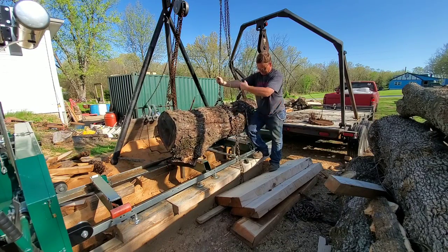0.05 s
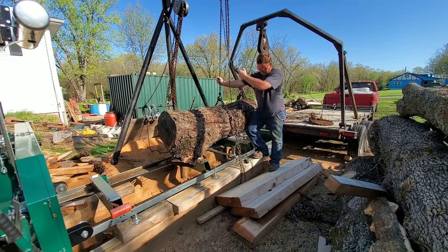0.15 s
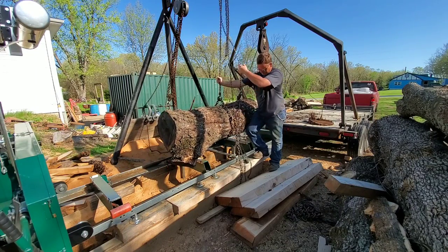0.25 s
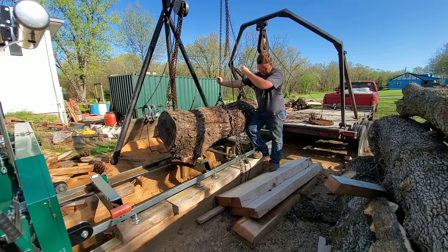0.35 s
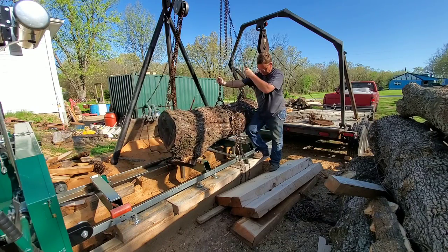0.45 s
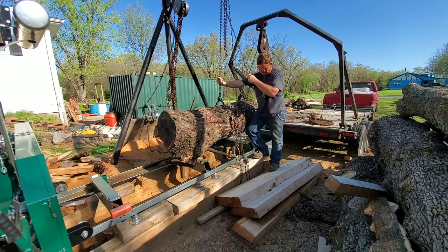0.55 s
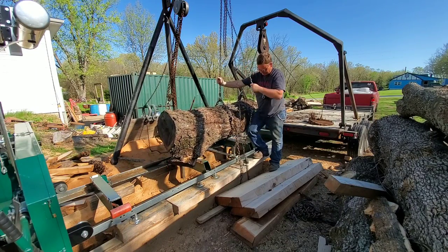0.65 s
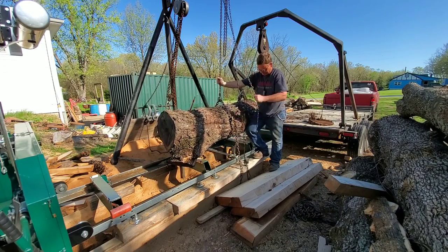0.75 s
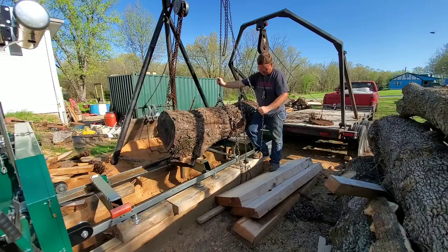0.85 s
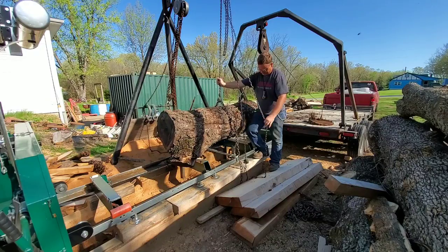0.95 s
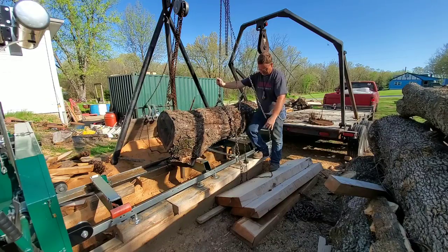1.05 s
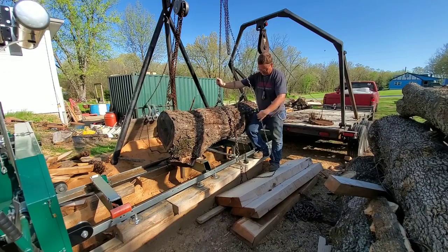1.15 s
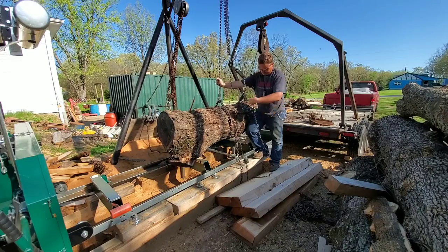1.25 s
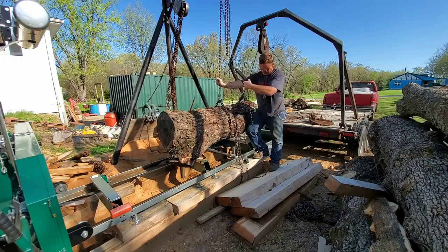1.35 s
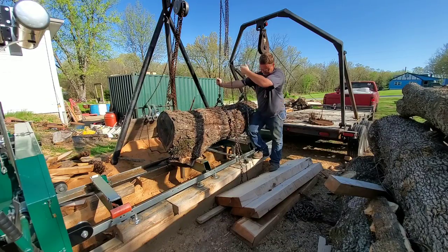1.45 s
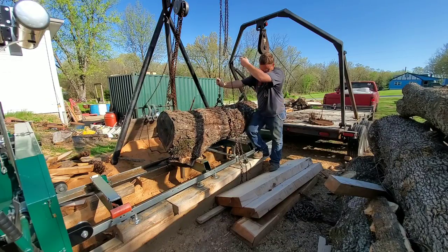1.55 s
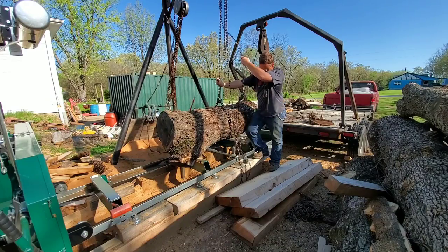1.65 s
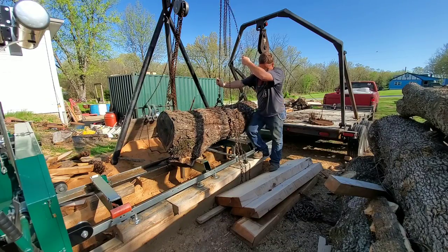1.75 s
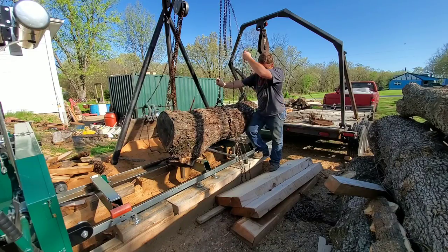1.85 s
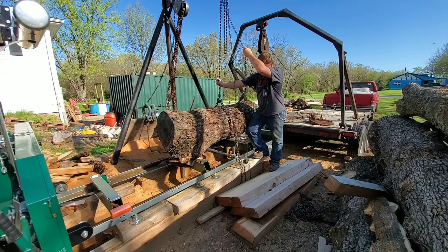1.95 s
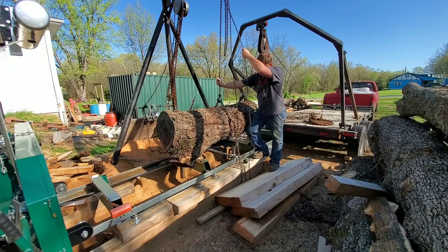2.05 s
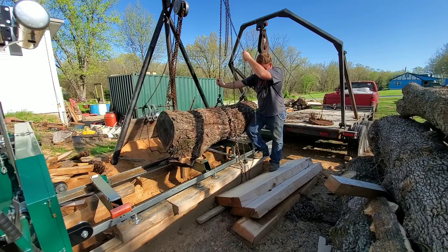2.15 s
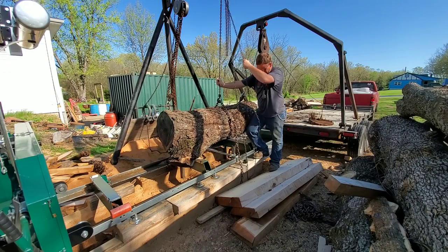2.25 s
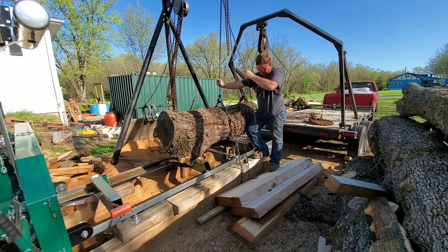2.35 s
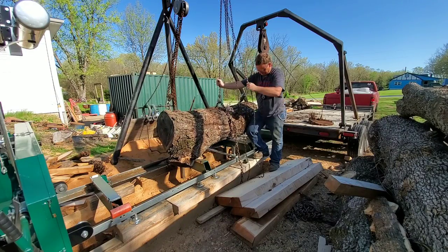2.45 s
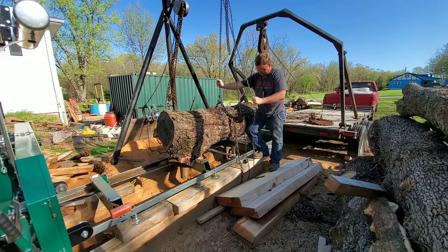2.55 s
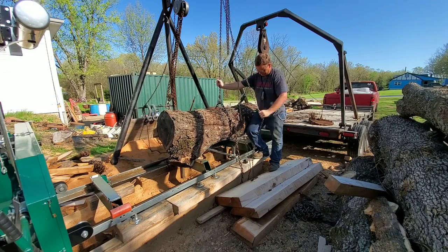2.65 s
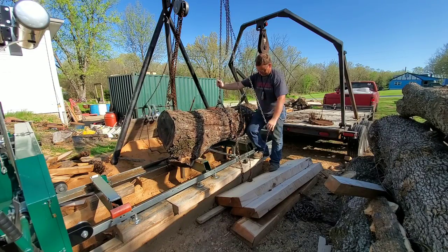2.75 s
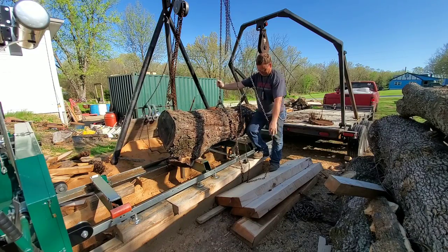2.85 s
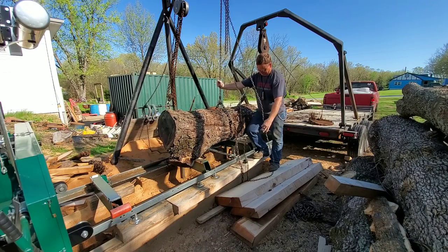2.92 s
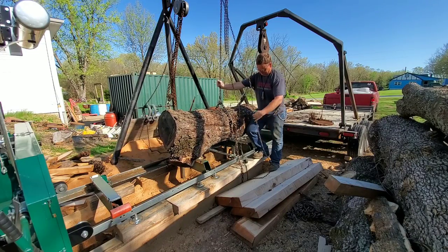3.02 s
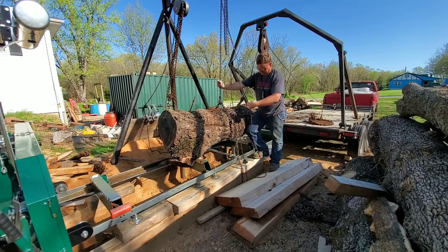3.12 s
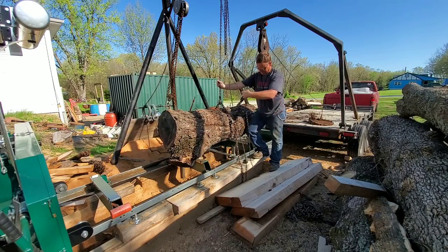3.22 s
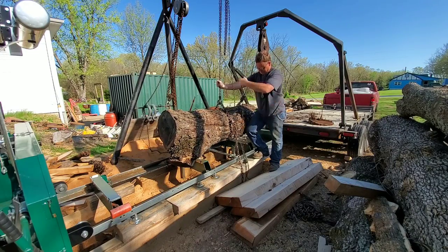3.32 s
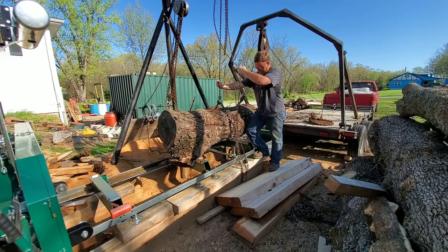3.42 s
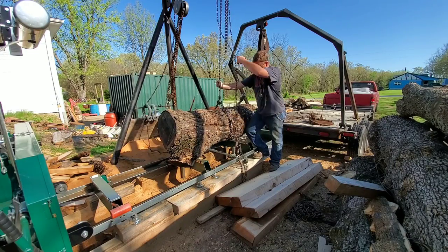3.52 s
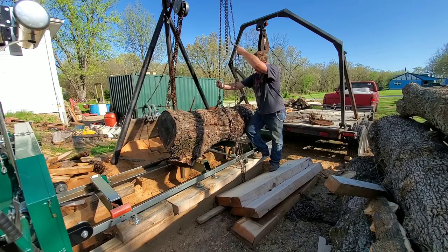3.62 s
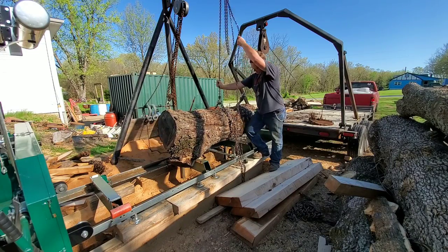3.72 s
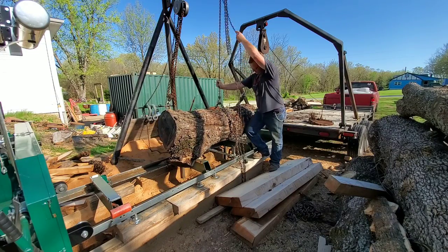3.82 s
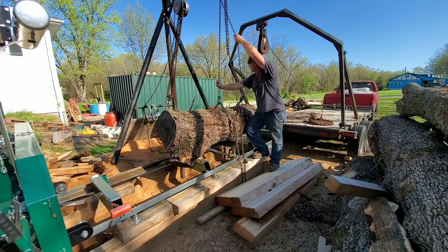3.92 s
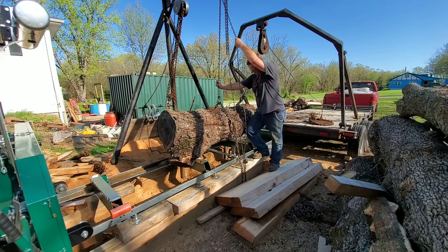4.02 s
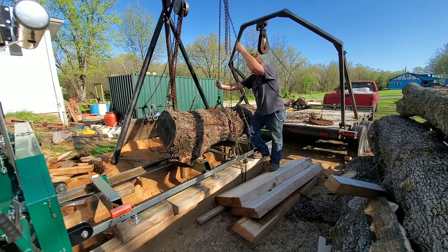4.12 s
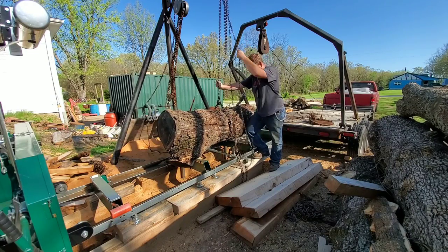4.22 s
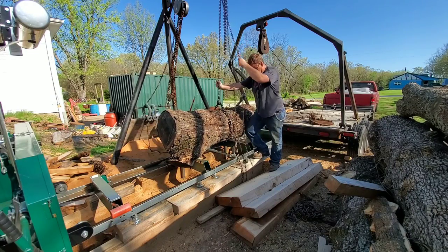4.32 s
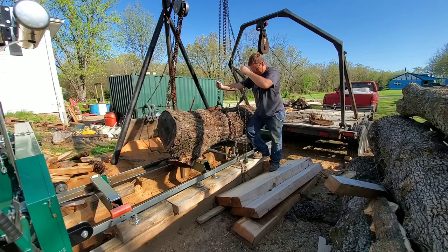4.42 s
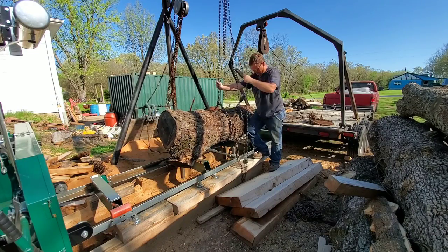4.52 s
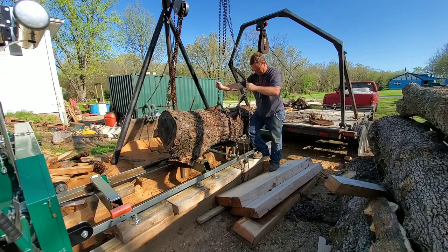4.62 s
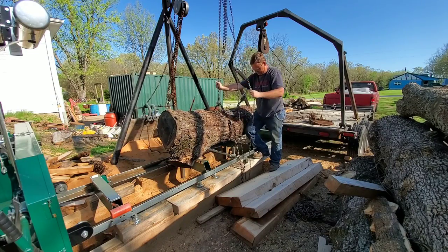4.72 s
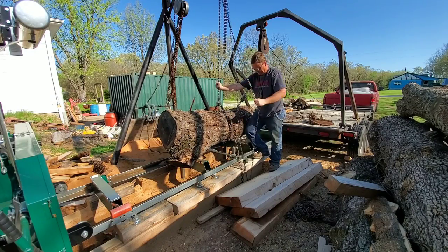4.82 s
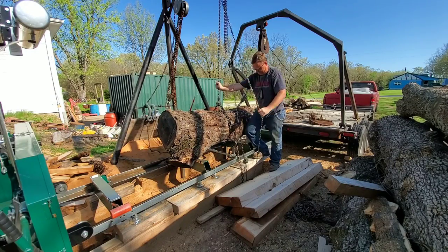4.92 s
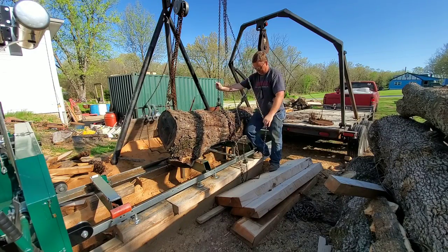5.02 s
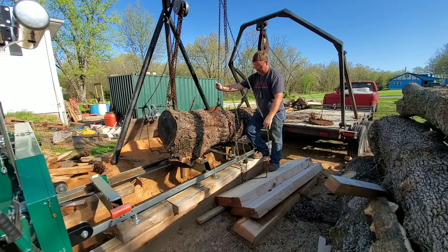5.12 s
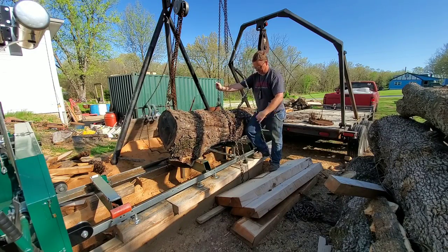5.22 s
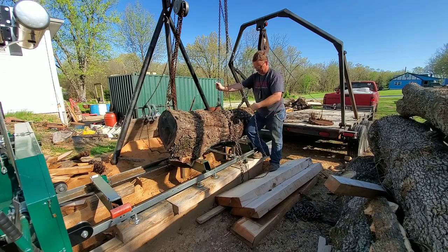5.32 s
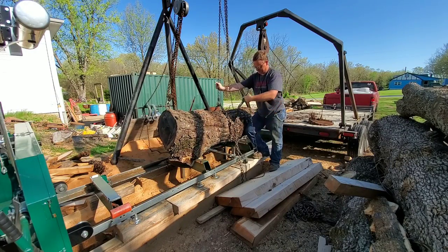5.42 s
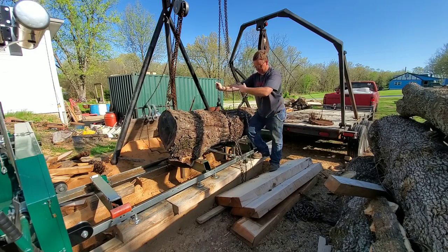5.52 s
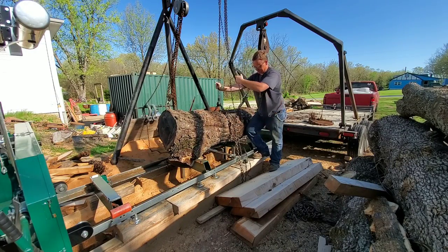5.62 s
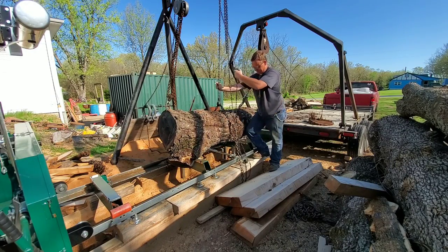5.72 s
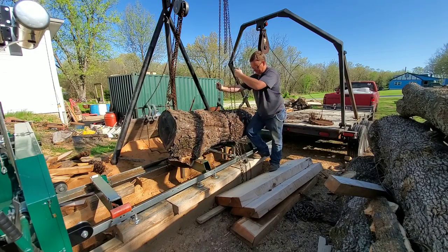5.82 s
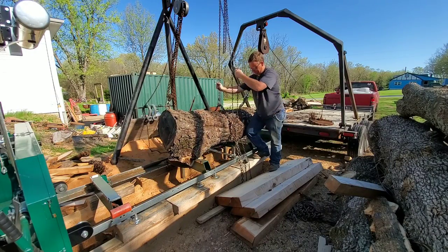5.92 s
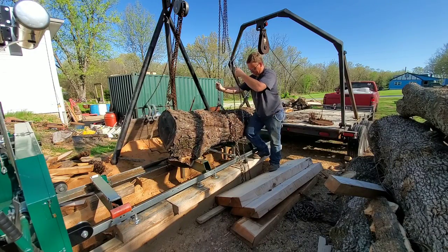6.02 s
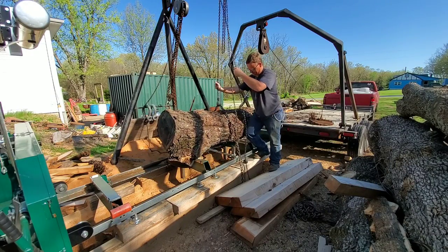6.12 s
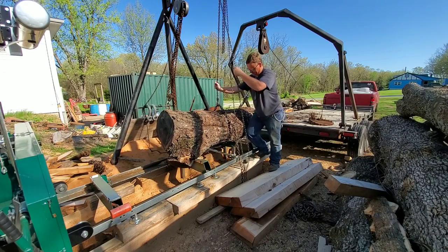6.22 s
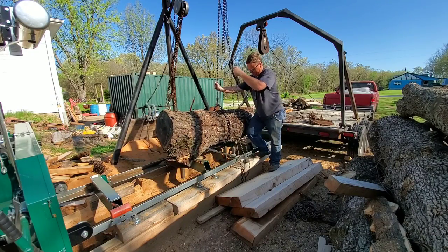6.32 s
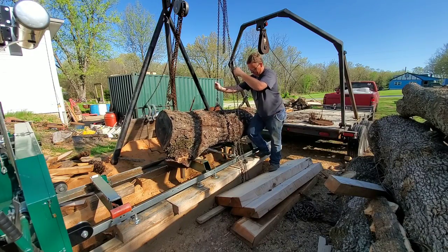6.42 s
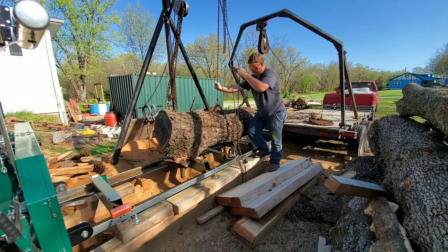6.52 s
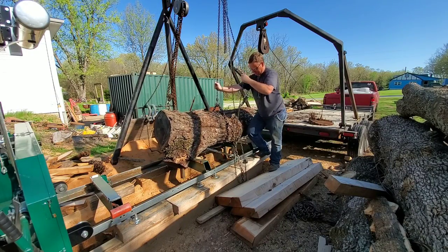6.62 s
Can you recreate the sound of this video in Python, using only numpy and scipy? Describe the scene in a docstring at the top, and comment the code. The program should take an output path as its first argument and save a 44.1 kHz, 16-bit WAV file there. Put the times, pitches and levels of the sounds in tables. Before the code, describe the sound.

A hand chain hoist is worked in three long pulls, each a burst of rapid ratchet clacks with links clattering over the wheel. Between pulls, the slack chain clinks and slaps a steel frame, which rings briefly. The hanging log's rigging knocks now and then. It is outdoors with little echo, over a very faint breeze and a distant engine hum.

```python
"""Outdoors in a log yard, a hand chain hoist lifts a log in three long pulls. Its pawl drops off each
tooth and excites the modes of the steel housing, while colliding links clatter over the wheel.
Mostly between pulls, the slack chain strikes the steel frame, which rings in free vibration. The load
knocks now and then, friction makes a pulley squeak, and a far engine hums under a light breeze."""
import sys
import numpy as np
from scipy import signal
from scipy.fft import rfft, irfft, next_fast_len
from scipy.io import wavfile
from scipy.ndimage import map_coordinates

SR = 44100
rng = np.random.default_rng(int(sys.argv[2]) if len(sys.argv) > 2 else 0)


def persist_wave(psi):
    """Save psi, clipped to +-1, as 16-bit WAV."""
    counts = np.round(np.clip(psi, -1, 1) * 32767).astype(np.int16)
    wavfile.write(sys.argv[1], SR, np.atleast_2d(counts).T)


N = 294147
HIT = np.arange(6144) / SR  # time in seconds within a short impact
RING = np.arange(13312) / SR  # time in seconds within a long ring

# Spectra of the breeze, the load's thud and crack, running links, lightly touching links, and a slap's
# body and treble. Each row: frequency in Hz, relative spectral density in dB.
BREEZE_SPECTRUM = [(150, 1.5), (500, 2.5), (1100, -5), (1600, -10.5), (2400, -16.5), (4000, -23),
                   (15000, -38)]
THUD_SPECTRUM = [(100, -27.5), (165, -4.5), (212, -2), (250, -1.5), (310, -2), (400, -0.5), (510, 9),
                 (600, 4.5), (700, 3), (900, -2), (1200, -26.5), (2200, -61)]
CRACK_SPECTRUM = [(200, -59), (500, -8.5), (1000, 4), (2500, 0.5), (5000, -14), (15000, -28.5)]
LINK_SPECTRUM = [(300, -13), (1000, 7), (2200, 3.5), (3800, 3), (4500, 4), (5200, -2), (7300, 1),
                 (8000, -8), (8700, -1.5), (9800, -0.5), (10800, -11), (11500, 1.5), (12600, -0.5),
                 (15300, -0.5)]
TAP_SPECTRUM = [(1800, -10), (4000, -11), (6500, 3), (8000, -23.5), (9500, -1), (12000, -2), (15000, 4.5)]
SLAP_SPECTRUM = [(400, -10.5), (1200, -3), (1900, -3), (4500, -7.5), (7000, -11), (9000, -28), (15000, -63)]
SLAP_TREBLE_SPECTRUM = [(3000, -49), (7000, 6), (8000, 7.5), (9400, 11), (10800, 3.5), (12000, 5.5),
                        (15300, 2.5)]
# Resonances of the housing (low and upper), pawl, gear train and chain guide.
# Each row: frequency in Hz, bandwidth in Hz, relative gain in dB.
HOUSING_LOW = [(863.4, 41, 11), (933.5, 23.2, 8), (994, 38, 5.5)]
HOUSING_UPPER = [(1221, 43, 5.5), (1370, 510, -4.5), (1563, 240, 2.5), (1754, 34, 7), (1839, 35, -1),
                 (2512, 27, -10.5), (2946, 18.3, -2.5), (3183, 43, 2), (3380, 19.6, 0), (3550, 15, -12.5),
                 (4443, 17, -7)]
PAWL_RESONANCES = [(4450, 24, -16), (6060, 140, -3.5), (8600, 54, -1.5), (9250, 92, -2)]
GEAR_RESONANCES = [(208, 11, 4.5), (276.4, 22, 10)]
GUIDE_RESONANCES = [(495, 22, -21), (566, 5.1, -14.5)]
# Free modes of the wheel and the steel frame. Each row: frequency in Hz, relative level in dB.
WHEEL_RING = [(515, -11), (581, -13), (840, -6), (890, -5), (1040, -8), (1226, -9), (1720, -2), (1748, 0),
              (3145, -9)]
FRAME_RING = [(1926, -7), (2128, -8), (2192, -7), (2552, -9), (3079, -6), (3383, 0), (3535, -4), (3681, -7),
              (3908, -4), (4097, -9), (4311, -6), (4397, -9), (4521, 0), (4709, -4), (4790, -11),
              (4908, -4), (5230, -5), (5440, -7), (5643, -9), (6089, -8), (6663, -10), (6844, -9),
              (6939, -11), (7160, -11), (7792, -13), (8578, -14), (11662, -14), (12143, -12), (13298, -16),
              (14940, -17)]
# Likeness of the two channels. Each row: frequency in Hz, left-right correlation.
COHERENCE = [(30, .8), (100, .96), (300, .92), (700, .95), (1400, .87), (3100, .68), (6000, .45),
             (15000, .45)]
# Stereo balance of the hoist. Each row: frequency in Hz, left minus right level in dB.
BALANCE = [(1000, 0.5), (3300, 0), (4500, -3.5), (6000, -4.5), (7800, -2), (9000, -7.5), (11000, 0),
           (15000, -1.5)]
# Reverberation of the yard. Each row: frequency in Hz, time to fall 60 dB in seconds.
YARD_DECAY = [(200, 0.23), (1000, 0.46), (4000, 0.34), (14000, 0.02)]
# Envelopes of the engine's two tones. Each row: time in seconds, relative level in dB.
UPPER_HUM = [(0.0, -59), (0.07, -54.5), (1.09, -50), (2.17, -39.5), (3.17, -51.5), (3.55, -43), (4.7, -43),
             (5.98, -47), (6.02, -61), (6.67, -43.5)]
LOWER_HUM = [(0.0, -59), (1.8, -57), (1.99, -43), (2.43, -53), (4.89, -39), (4.96, -48), (6.61, -46.5),
             (6.67, -56)]
# Squeaks of the pulley. Each row: start in seconds, length in seconds, first and last pitch in Hz,
# level in dB, jitter as a fraction of the pitch.
PULLEY_SQUEAKS = [(0.0, 0.16, 270.5, 262, -45, 0.071), (0.02, 0.18, 13750, 13700, -47, 0.008),
                  (0.022, 0.076, 14300, 14000, -35, 0.012), (0.083, 0.066, 3660, 3200, -45, 0.012)]
# Knocks of the load, taps of loose links and pings of the hook.
# Each row: start in seconds, relative level in dB.
LOAD_KNOCKS = [(0.261, -39.5), (0.574, -31), (1.012, -33), (1.034, -42), (1.133, -32.5), (1.616, -37.5),
               (1.645, -52), (1.929, -39.5), (2.416, -44), (2.644, -34), (3.406, -37.5), (3.421, -39),
               (4.201, -27.5), (4.225, -30), (4.487, -20), (4.505, -19.5), (5.716, -45), (5.982, -55)]
LINK_TAPS = [(0.387, -29), (0.513, -25), (1.289, -32), (1.412, -27.5), (1.709, -18.5), (2.1563, -30),
             (3.2765, -60), (3.3817, -37), (3.4046, -28), (3.4233, -25), (3.5364, -30.5), (3.6914, -49),
             (3.7807, -29), (3.9478, -18), (4.0503, -28), (5.5758, -23.5), (5.6246, -52)]
HOOK_PINGS = [(3.629, -33.5), (5.288, -30.5)]
# Chain slaps on the frame. Each row: start in seconds, relative level in dB, treble offset in dB.
FRAME_SLAPS = [(0.151, -28, -9.5), (0.312, -29.5, -15), (1.455, -33, -5.5), (1.646, -23, -3),
               (1.895, -37, -4), (2.055, -27, -35), (3.131, -32.5, -13), (3.735, -37.5, -16),
               (3.841, -33, -10), (4.36, -21.5, -12), (5.472, -29.5, -9), (5.709, -21.5, -6.5),
               (5.85, -33, -11), (6.168, -42.5, -11), (6.587, -25.5, -15)]
# Hard pulls on the hand chain, with light reaches for a new grip between them.
# Each row: start in seconds, end in seconds, effort in dB.
HAND_STROKES = [(0.0, 0.42, -23), (0.666, 1.12, -1), (1.64, 2.24, -18.5), (2.37, 2.9, -4),
                (3.56, 4.1, -24.5), (4.241, 5.14, -2), (5.54, 6.08, -26.5), (6.64, 6.674, -16)]
# Pawl clacks, one a tooth. Each row: start in seconds, relative levels of clack and link clink in dB.
PAWL_CLACKS = [(0.246, -22, -43), (0.406, -22.5, -39.5), (0.454, -12, -25), (0.552, -13.5, -27.5),
               (0.576, -11.5, -21.5), (0.631, -9, -24.5), (0.662, -13, -22), (0.679, -7, -21),
               (0.704, -16.5, -20.5), (0.729, -10, -20), (0.775, -6.5, -28.5), (0.811, -9, -25),
               (0.845, -8.5, -20.5), (0.88, -10.5, -35.5), (0.913, -8, -22), (0.939, -4.5, -19),
               (0.972, -2.5, -24), (1.003, -4, -17.5), (1.035, -3.5, -20.5), (1.064, -11.5, -25.5),
               (1.094, -9.5, -42), (1.13, -17, -28), (1.174, -10, -29), (1.246, -13, -29),
               (1.364, -29.5, -43), (1.888, -18.5, -30.5), (1.896, -10.5, -14), (2.176, -24, -52),
               (2.198, -16, -35.5), (2.286, -9, -25.5), (2.351, -7, -24), (2.398, -3.5, -17.5),
               (2.438, -8.5, -23), (2.472, -9, -22), (2.506, -13, -27), (2.536, -8, -24.5),
               (2.572, -8, -22), (2.6, -7.5, -26), (2.629, -6, -21.5), (2.657, -6, -21.5),
               (2.684, -10.5, -19.5), (2.708, -9, -24), (2.737, -8.5, -23), (2.762, -7, -22),
               (2.792, -4.5, -22.5), (2.819, -9, -25), (2.846, -7.5, -24), (2.875, -10.5, -26),
               (2.906, -10.5, -33), (2.94, -6, -26.5), (2.988, -13.5, -29.5), (3.056, -31, -36.5),
               (3.522, -28, -48), (3.628, -28, -45), (3.904, -14, -31), (3.95, -26.5, -47),
               (4.065, -17.5, -28), (4.138, -18.5, -37), (4.169, -16.5, -31), (4.2, -14.5, -21.5),
               (4.225, -12, -29), (4.286, -5, -23.5), (4.346, -6.5, -21.5), (4.403, -4.5, -21),
               (4.452, -2, -16), (4.488, -4, -16.5), (4.556, -4.5, -24.5), (4.602, -7.5, -26),
               (4.648, -3, -22.5), (4.692, -8, -22.5), (4.741, -3, -23.5), (4.793, -3, -20),
               (4.839, -5.5, -23.5), (4.885, -2.5, -18), (4.929, -3.5, -18), (4.971, -2, -17),
               (5.007, -6.5, -20.5), (5.047, -6.5, -20.5), (5.085, -9.5, -22.5), (5.12, -7, -24.5),
               (5.161, -6.5, -24.5), (5.211, -13, -29.5), (5.287, -18.5, -40), (5.666, -22.5, -56),
               (5.923, -16, -30.5), (6.006, -23, -45), (6.103, -29.5, -42.5), (6.528, -31.5, -62)]


def amp(db):
    """Amplitude grows tenfold for every 20 dB."""
    return 10 ** (np.asarray(db) / 20)


def unit(x):
    """Normalisation to an rms of 1."""
    return x / np.sqrt(np.mean(x ** 2) + 1e-20)


def along(points, hz):
    """Interpolation of (Hz, value) points on a logarithmic frequency axis."""
    f, values = np.transpose(points)
    return np.interp(np.log(hz + 1), np.log(f + 1), values)


def wobble(rate):
    """Smooth fluctuation: a spline through `rate` random knots a second."""
    knots = rng.standard_normal(int(N * rate / SR) + 4)
    return map_coordinates(knots, [np.arange(N) * rate / SR])


def filtered(x, response):
    """Linear filtering: the spectrum is multiplied by a frequency response."""
    n = x.shape[-1]
    m = 2 * next_fast_len(n // 2 + 2048)
    return irfft(rfft(x, m) * response(np.fft.rfftfreq(m, 1 / SR)), m)[..., :n]


def colour(points):
    """Minimum phase: folding the cepstrum gives a causal response with this spectrum."""
    def response(hz):
        cepstrum = irfft(np.log(amp(along(points, hz))))
        cepstrum[1:len(hz) - 1] *= 2
        cepstrum[len(hz):] = 0
        return np.exp(rfft(cepstrum))
    return response


def body(modes):
    """Modal superposition: a body responds as a sum of damped resonators, here of alternating sign."""
    return lambda f: sum((-1) ** k * amp(db) * 1j * f * width / (hz * hz - f * f + 1j * f * width)
                         for k, (hz, width, db) in enumerate(modes))


def band(modes, low_hz, high_hz):
    """Filters in cascade: a band-pass steepens the skirts of the resonances."""
    skirts = signal.butter(3, [low_hz, high_hz], "band", analog=True)
    return lambda hz: body(modes)(hz) * signal.freqs(*skirts, hz)[1]


def stereo(pair):
    """Partial coherence: two unrelated signals become channels alike in the bass, apart in the treble."""
    def weights(hz):
        angle = np.arccos(np.clip(along(COHERENCE, hz), -1, 1)) / 2
        return np.array([np.cos(angle), np.sin(angle)])
    mid, side = filtered(pair, weights)
    return np.array([mid + side, mid - side])


def noise(response):
    """Spectral shaping of white noise: steady, stereo, rms 1."""
    return unit(stereo(filtered(rng.standard_normal((2, N)), response)))


def placed(times, levels_db, sounds):
    """Superposition of blows, each at its time, its level being the rms of its first 20 ms."""
    out = np.zeros((2, N + len(RING)))
    for start, db, sound in zip(times, levels_db, sounds):
        rms = np.sqrt(np.mean(sound[:, :SR // 50] ** 2, axis=1, keepdims=True))
        out[:, round(start * SR):][:, :sound.shape[1]] += amp(db) * sound / rms
    return out[:, :N]


def uneven_times(count):
    """Timing jitter: one event falls at random in each of `count` equal intervals."""
    return (np.arange(count) + rng.random(count)) / count * (N - 1) / SR


def chatter(count, t60, tail_db, tail_t60):
    """Impact excitation: a decaying noise burst with a gritty after-rattle, as (blows, 2, samples)."""
    grit = np.repeat(amp(2.5 * rng.standard_normal((count, 1, len(HIT) // 32))), 32, axis=2)
    fade = amp(-60 * HIT / t60) + amp(tail_db - 60 * HIT / tail_t60) * grit
    return rng.standard_normal((count, 2, len(HIT))) * fade


def bounced(sounds, gap_s, db):
    """Elastic rebound: each blow makes a second contact, of random delay and strength."""
    t = HIT[:sounds.shape[-1]]
    delay, strength = .5 + rng.random((len(sounds), 2)).T
    lags = np.searchsorted(t, gap_s * delay)
    again = np.array([np.pad(x, ((0, 0), (lag, 0)))[:, :len(t)] for x, lag in zip(sounds, lags)])
    return sounds + amp(db) * strength[:, None, None] * again


def ringing(hz, db, t60, t, count, scatter_db):
    """Free vibration: each of `count` blows starts damped modes at random amplitudes and phases."""
    decay = amp(db[:, None] - 60 * t / t60 * (hz[:, None] / 4000) ** 0.022)  # high modes die sooner
    phase = 2 * np.pi * hz[:, None] * t
    strengths = rng.standard_normal((count, 2, 2 * len(hz)))
    strengths *= np.tile(amp(scatter_db * rng.standard_normal((count, 1, len(hz)))), 2)
    waves = np.vstack([decay * np.cos(phase), decay * np.sin(phase)])
    return (strengths.reshape(2 * count, -1) @ waves).reshape(count, 2, -1)


def clinks(spectrum, t60, t, count, modes):
    """Each link has its own natural frequencies; every jolt excites a new mixture of them."""
    hz = 1800 + 13800 * (np.arange(modes) + rng.random(modes)) / modes
    return ringing(hz, along(spectrum, hz), t60, t, count, scatter_db=4)


def effort(rise_db_per_s=182, coast_db_per_s=107, sway_db=-30.5, settle_at_s=6.15):
    """Inertia: the chain's motion, in dB, builds up to each stroke and coasts down to a faint sway."""
    t = np.arange(N) / SR
    strokes = [db - rise_db_per_s * np.maximum(start - t, 0) - coast_db_per_s * np.maximum(t - end, 0)
               for start, end, db in HAND_STROKES]
    sway = sway_db - coast_db_per_s * np.maximum(t - settle_at_s, 0)
    return np.max(strokes + [sway], axis=0)


def breeze():
    """Moving air makes steady broadband noise, strongest at low frequencies."""
    return amp(-56) * noise(colour(BREEZE_SPECTRUM))


def far_engine(upper_hz=81.4, lower_hz=63):
    """Nearly periodic vibration: a far engine hums on two wavering tones over a low rumble."""
    def tone(hz, envelope, gain_db):
        db = np.interp(np.arange(N) / SR, *np.transpose(envelope))
        pitch = hz * (1 + 0.019 * wobble(9))
        return amp(db + gain_db) * unit(np.sin(2 * np.pi * np.cumsum(pitch) / SR))
    hum = tone(upper_hz, UPPER_HUM, gain_db=-2) + tone(lower_hz, LOWER_HUM, gain_db=-4)
    rumble = colour([(15, -31), (30, -22), (42, -18.5), (52, 3.5),
                     (75, -4), (130, -8), (200, -14), (600, -62)])
    return hum + amp(-52) * noise(rumble)


def yard_reverb(x, delay_s=.008):
    """Scattering from log piles and a wall adds a short diffuse tail."""
    hz, t, spectra = signal.stft(rng.standard_normal((2, SR // 2)), SR, nperseg=256)
    decay = amp(-60 * t / along(YARD_DECAY, hz)[:, None])
    tail = signal.istft(spectra * decay, SR, nperseg=256)[1]
    tail = np.pad(tail / np.linalg.norm(tail[0]), ((0, 0), (round(delay_s * SR), 0)))
    return signal.fftconvolve(x, tail, axes=1)[:, :N]


def pulley_squeak(start, length, from_hz, to_hz, db, jitter):
    """Friction makes a dry pulley oscillate briefly on one unsteady, sliding tone."""
    progress = np.clip((np.arange(N) / SR - start) / length, 0, 1)
    hz = (from_hz + (to_hz - from_hz) * progress) * (1 + jitter * wobble(596))
    return amp(db) * np.sin(np.pi * progress) * np.sin(2 * np.pi * np.cumsum(hz) / SR)


def hook_pings(hz=876, t60=0.23):
    """The nudged hook vibrates in a single damped mode."""
    starts, db = np.transpose(HOOK_PINGS)
    ping = np.sin(2 * np.pi * hz * RING) * amp(-60 * RING / t60)
    return placed(starts, db, np.tile(ping, (len(starts), 2, 1)))


def load_knocks():
    """Impacts of rigging shifting under the log: a thud and a dry crack, duller when heavy."""
    starts, level = np.transpose(LOAD_KNOCKS)
    blow = chatter(len(starts), t60=.025, tail_db=-6, tail_t60=.14)
    thuds = placed(starts, level - 1, filtered(blow, colour(THUD_SPECTRUM)))
    cracks = placed(starts, 0.72 * level - 6, filtered(blow, colour(CRACK_SPECTRUM)))
    return stereo(thuds + cracks)


def frame_slaps(graze_lead_s=0.0081):
    """Impact of the slack chain excites the frame: a clank, a splash of links, then free ringing."""
    starts, level, treble = np.transpose(FRAME_SLAPS)
    count = len(starts)
    contact = chatter(count, t60=.004, tail_db=-15, tail_t60=.06)
    clank = placed(starts, level - 6, filtered(contact, band([(1954, 280, 0)], 2120, 4400)))
    hz, db = np.transpose(FRAME_RING)
    ring = placed(starts, level - 6, ringing(hz, db, .21, RING, count, scatter_db=1))
    swell = 1 - np.exp(-RING / .004)  # the links land one after another
    jingle = placed(starts, level - 4, swell * clinks(SLAP_SPECTRUM, .16, RING, count, modes=260))
    bright_links = clinks(SLAP_TREBLE_SPECTRUM, .16, RING, count, modes=200)
    sparkle = placed(starts, level + treble, swell * bright_links)
    rattle = filtered(chatter(count, t60=.07, tail_db=2, tail_t60=.17), colour(SLAP_SPECTRUM))
    splash = placed(starts, level - 4, rattle)
    graze = placed(starts - graze_lead_s, level - 20, rattle[::-1])  # the leading link touches first
    return stereo(graze + clank + ring + jingle + sparkle + splash)


def slack_chain(stray_count=150):
    """Light collisions ring the high modes of loose links, a few clearly and many faintly at random."""
    starts, level = np.transpose(LINK_TAPS)
    links = placed(starts, level - 18, clinks(TAP_SPECTRUM, .06, HIT, len(starts), modes=60))
    contact = chatter(len(starts), t60=.012, tail_db=-14, tail_t60=.1)
    ticks = placed(starts, level - 16, filtered(contact, colour(TAP_SPECTRUM)))
    times = rng.random(stray_count) * (N - 1) / SR
    sizes_db = 5 * np.minimum(rng.standard_normal(stray_count), 1.5)
    strays = placed(times, sizes_db, clinks(TAP_SPECTRUM, .03, HIT[:2304], stray_count, modes=60))
    return stereo(links + ticks + amp(0.88 * effort() - 34.5) * unit(strays))


def load_chain(count=170):
    """Forced vibration: loaded links bump into their sprocket and rattle the housing, more in a pull."""
    effort_db = effort()
    times = uneven_times(count)
    sizes_db = 3 * np.minimum(rng.standard_normal(count), 2)
    contacts = stereo(placed(times, sizes_db, chatter(count, t60=.025, tail_db=-6, tail_t60=.14)))
    bumps = unit(filtered(contacts, colour(THUD_SPECTRUM)))
    rattle = unit(filtered(contacts, band(HOUSING_LOW + HOUSING_UPPER, 400, 5000)))
    return amp(0.49 * effort_db - 42) * bumps + amp(0.9 * effort_db - 34) * rattle


def running_chain(count=480):
    """Random excitation: links clink and scrape over the wheel, stirring guide and housing; gears rumble."""
    effort_db = effort()
    times = uneven_times(count)
    sizes_db = 3.5 * np.clip(rng.standard_normal(count), -2, 1.3)
    links = placed(times, sizes_db, clinks(LINK_SPECTRUM, .065, HIT[:2304], count, modes=130))
    jingle = amp(effort_db - 30) * unit(stereo(links))
    scrape = stereo(rng.standard_normal((2, N)) * amp(2.5 * wobble(300) + 2 * wobble(40)))
    hiss = amp(1.04 * effort_db - 34) * unit(filtered(scrape, colour(LINK_SPECTRUM)))
    guide_and_housing = body(GUIDE_RESONANCES + HOUSING_LOW + HOUSING_UPPER)
    churn = amp(0.77 * effort_db - 33) * unit(filtered(scrape, guide_and_housing))
    gears = amp(0.78 * effort_db - 45) * noise(band(GEAR_RESONANCES, 190, 450))
    return jingle + hiss + churn + gears


def pawl():
    """Impulse response: the pawl drops off each tooth, ringing housing and wheel and jolting the links."""
    starts, clack_db, clink_db = np.transpose(PAWL_CLACKS)
    count = len(starts)
    drop = chatter(count, t60=.0072, tail_db=-19, tail_t60=.11)
    drop[:, 0, 0] += 5  # the hard first contact
    drop = bounced(drop, gap_s=.005, db=-8)
    jolt = chatter(count, t60=.14, tail_db=-7, tail_t60=.11)
    low_ring = placed(starts, clack_db - 18, filtered(drop, band(HOUSING_LOW, 750, 1380)))
    upper_db = 1.095 * clack_db - 15  # a harder clack is brighter
    upper_ring = placed(starts, upper_db, filtered(drop, band(HOUSING_UPPER, 910, 6600)))
    hz, db = np.transpose(WHEEL_RING)
    wheel = placed(starts, clack_db - 26.5, ringing(hz, db, .22, RING, count, scatter_db=2))
    ticks = placed(starts, clink_db - 6, filtered(jolt, colour(LINK_SPECTRUM)))
    links = placed(starts, clink_db - 7, clinks(LINK_SPECTRUM, .14, HIT, count, modes=130))
    pings = placed(starts, clink_db - 14, filtered(jolt, band(PAWL_RESONANCES, 5100, 12000)))
    return stereo(low_ring + upper_ring + wheel + ticks + links + pings)


def scene():
    """Superposition of the hoist's direct sound, its reverberation and the background."""
    hoist = pawl() + running_chain() + load_chain() + slack_chain()
    hoist += frame_slaps() + load_knocks() + hook_pings()
    hoist += sum(pulley_squeak(*row) for row in PULLEY_SQUEAKS)
    hoist = filtered(hoist, lambda hz: amp(np.outer([1, -1], along(BALANCE, hz)) / 2))
    return hoist + amp(-15) * yard_reverb(hoist) + far_engine() + breeze()


def record(dry):
    """Band limiting: a steep low-pass removes the highest treble."""
    cutoff_hz = 15600
    return filtered(dry, lambda hz: 1 / np.sqrt(1 + (hz / cutoff_hz) ** 160))


dry = scene()
out = record(dry)
persist_wave(out)
```